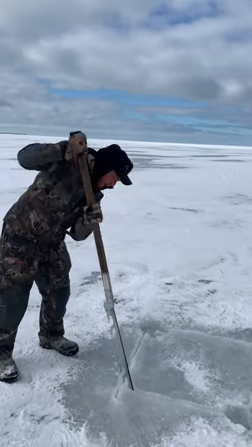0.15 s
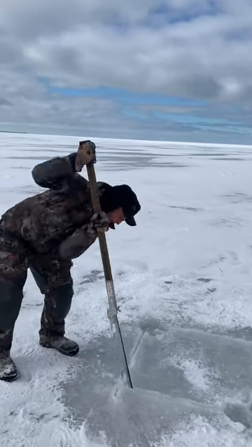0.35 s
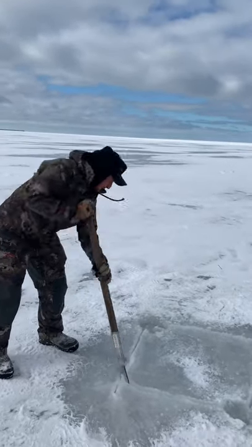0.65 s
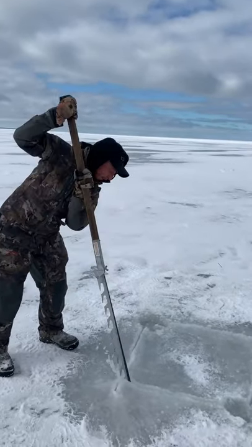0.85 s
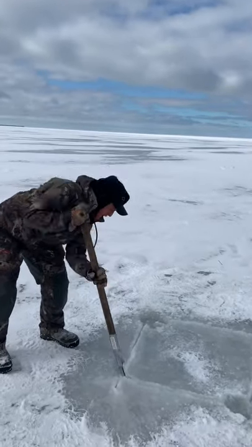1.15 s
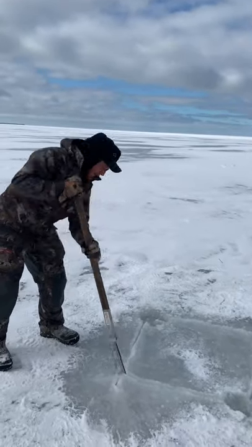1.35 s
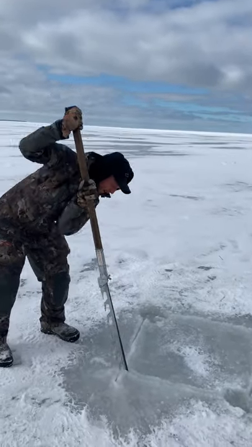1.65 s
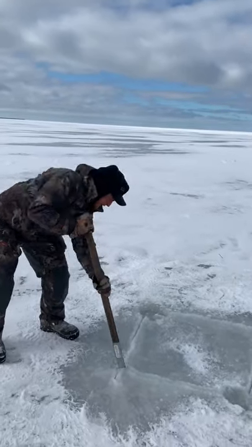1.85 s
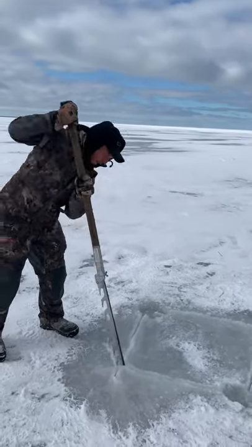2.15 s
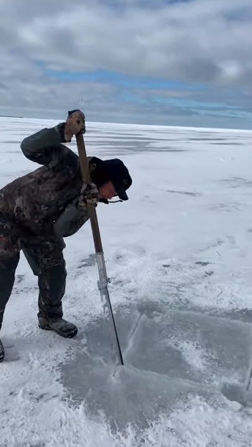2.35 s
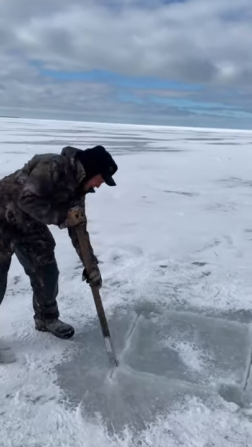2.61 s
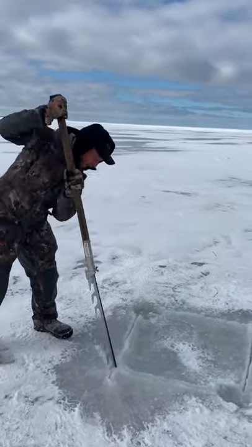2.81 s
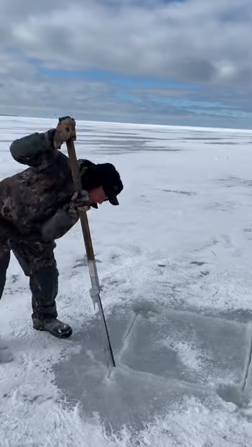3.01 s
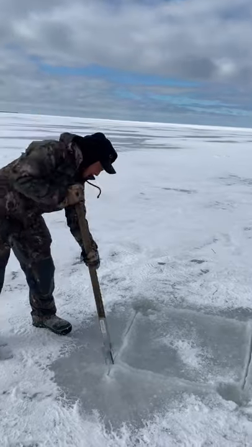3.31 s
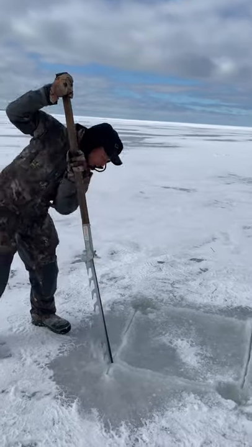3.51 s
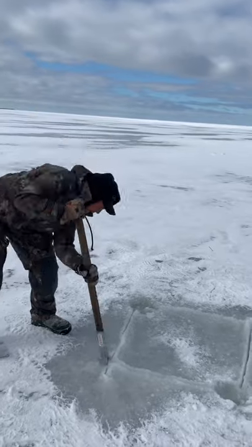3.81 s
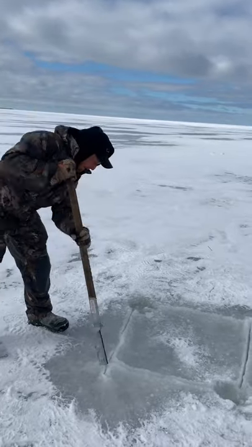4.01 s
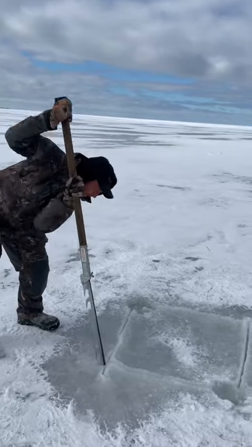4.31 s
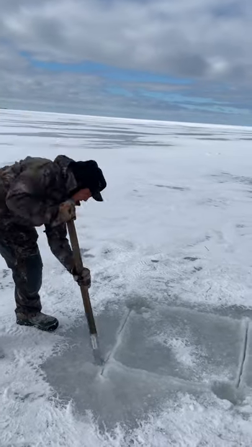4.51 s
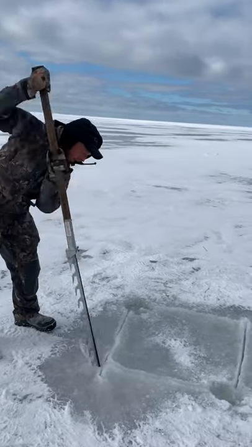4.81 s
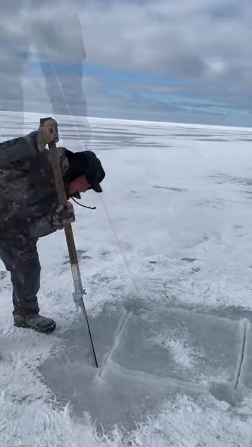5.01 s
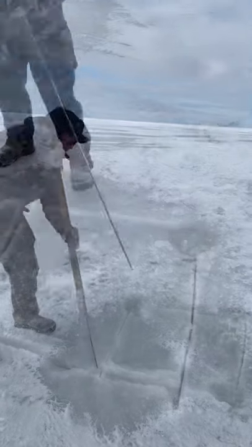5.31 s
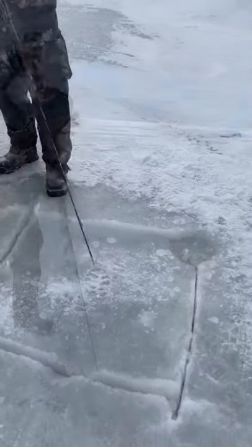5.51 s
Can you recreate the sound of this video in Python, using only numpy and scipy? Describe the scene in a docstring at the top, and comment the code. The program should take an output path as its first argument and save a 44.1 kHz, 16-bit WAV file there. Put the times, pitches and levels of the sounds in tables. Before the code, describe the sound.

Close outdoor sound of a long hand saw cutting lake ice. Quiet, wet, scraping pulls with small knocks alternate with short, bright, crunching pushes, about three every two seconds. Water gurgles once early on. Light wind grows midway into heavy gusts buffeting the microphone, then drops abruptly near the end, leaving a faint pull and a dull last sound.

```python
"""A long hand saw works up and down through thick lake ice in the open, starting on a pull.
Pulled up, the blade drags through slush (clumped noise and ringing grains) and knocks on the slot, ringing faintly;
pushed down, the teeth crush ice into a spray of ringing chips. Water gurgles hollowly in the slot once, early on.
Light wind swells midway into gusts that thump on the microphone, then drops abruptly near 5.2 s; a faint pull
and a short, dull, different sound come last. A faint distant hiss lies under it all."""
import sys
import numpy as np
from scipy import signal
from scipy.fft import rfft, irfft, next_fast_len
from scipy.io import wavfile
from scipy.ndimage import uniform_filter1d

SR = 44100
rng = np.random.default_rng(int(sys.argv[2]) if len(sys.argv) > 2 else 0)


def master_out(mix):
    """Clip the mix to full scale and print it as 16-bit PCM to the path in sys.argv[1]."""
    frames = np.transpose(np.atleast_2d(mix))
    ceiling = np.clip(frames, -1, 1)
    pcm = np.round(ceiling * 32767).astype(np.int16)
    wavfile.write(sys.argv[1], SR, pcm)


N = 249606

# down strokes, and in the last row a short, faint, dull sound of another kind shaped the same way:
#   (bite or onset [s], push builds [s], push holds [s], stop takes [s],
#   level at the bite [dB], level at full push [dB], treble against its median [dB])
DOWN_STROKES_AND_DULL_END = [(0.353, 0.083, 0.11, 0.068, -33, -19, -3.5),
                             (0.989, 0.11, 0.12, 0.054, -29, -19.5, -3.5),
                             (1.669, 0.13, 0.086, .045, -35.5, -18.5, -3),
                             (2.318, 0.1, 0.11, 0.054, -35.5, -19.5, -3),
                             (2.983, 0.1, 0.092, .06, -30, -17.5, -4),
                             (3.641, 0.11, 0.094, 0.06, -33.5, -18.5, -2.5),
                             (4.276, 0.1123, 0.12, 0.027, -32.5, -18.5, -4.5),
                             (4.953, 0.12, 0.078, 0.067, -27, -22, -4),
                             (5.568, 0.017, .06, 0.056, -44, -40, -17)]
SETTLE_S = 0.028   # the blade settles before the bite


def amp(db):
    """Decibels to gain."""
    return 10 ** (np.asarray(db) / 20)


def rms_one(x):
    """Scale to unit rms."""
    return x / np.sqrt(np.mean(x ** 2) + 1e-20)


def in_time(tables):
    """Columns of tables laid end to end, interpolated to every sample."""
    time_s, *columns = np.concatenate(tables).T
    return [np.interp(np.arange(N) / SR, time_s, column) for column in columns]


def moving(strokes, fade_s):
    """1 during the strokes, 0 between them, with ramps of fade_s."""
    t = np.arange(N) / SR
    on = sum((t >= rows[0][0]) & (t <= rows[-1][0]) for rows in strokes) * 1.
    return uniform_filter1d(on, max(int(fade_s * SR), 1), mode="nearest")


def drift(rate_hz):
    """Slow noise of unit rms: white noise through two poles at rate_hz, run at SR / 20."""
    r = np.exp(-40 * np.pi * rate_hz / SR)
    white = rng.standard_normal(N // 20 + 4002)
    slow = signal.lfilter([1], [1, -2 * r, r * r], white)[4000:]   # start-up discarded
    return np.interp(np.arange(N) / 20, np.arange(len(slow)), rms_one(slow))


def ring(clicks, hz, t60_s):
    """Two-pole resonator: a unit click sets off a decaying sine of height 1."""
    r, w = amp(-60 / (t60_s * SR)), 2 * np.pi * hz / SR
    return signal.lfilter([0, np.sin(w)], [1, -2 * r * np.cos(w), r * r], clicks + 1e-18)


def coloured(x, spectrum, tilt_db, pivot_hz, patchy_db, patch_rate_hz):
    """Half-octave bands, each flickering on its own; bands over the pivot follow tilt_db about its median."""
    hz, db = np.transpose(spectrum)
    size = next_fast_len(N)
    f = np.maximum(np.fft.rfftfreq(size, 1 / SR), 1)
    shaped = rfft(x, size) * amp(np.interp(np.log(f), np.log(hz), db, left=-90))
    out = np.zeros(N)
    for octave in np.arange(np.log2(hz[0]), np.log2(hz[-1]) + .5, .5):
        triangle = np.clip(1 - 2 * abs(np.log2(f) - octave), 0, 1)
        band = irfft(shaped * triangle, size)[:N]
        tilt_share = np.clip(octave - np.log2(pivot_hz) + .5, 0, 1)
        flicker_db = patchy_db * drift(patch_rate_hz)
        out += band * amp(flicker_db + tilt_share * (tilt_db - np.median(tilt_db)))
    return rms_one(out)


def at_random(per_s, level_db, hz):
    """Rows (time [s], level [dB], pitch [Hz]) at chance moments, 0-9 dB under level_db."""
    when, size, pitch = rng.random((int(per_s * N / SR), 3)).T
    db = level_db[(when * (N - 1)).astype(int)] - 9 * size
    return list(zip(when * (N - 1) / SR, db, hz * 2 ** (1.2 * (pitch - .4))))


def down_strokes_and_dull_end():
    """Each tooth bites as it enters the ice: crushing throbs faster the harder the push; a dull sound ends it."""
    # power density of the spray: (frequency [Hz], level [dB per Hz])
    crush = [(290, -36), (500, -15), (1510, 0.5), (1800, -2), (3330, -3.5), (4190, -5.5), (6640, -4.5),
             (7340, -9.5), (8850, -5.5), (13600, -15.5), (15500, -14)]
    strokes = down_shape()
    level_db, treble_db, clear = in_time(strokes)
    teeth_per_s = 45 * amp(.4 * (level_db + 19.0) + 1.64 * drift(11.1))
    throb = np.sin(2 * np.pi * np.cumsum(teeth_per_s) / SR)
    bite = amp(1.6 * throb + 0.98 * drift(58))
    broken = (chips(4000, 1.5, ring_s=0.032) + 1.22 * rng.standard_normal(N)) * bite
    spray = coloured(broken, crush, treble_db, 5400, patchy_db=1.5, patch_rate_hz=37)
    steel = amp(-13.0) * rms_one(blade(broken, 10.6))
    return amp(level_db) * moving(strokes, 0.0052) * (spray + steel + whine(clear, -12))


def down_shape():
    """Settle, bite, build, hold, stop: rows (time [s], level [dB], treble [dB], share of blade in air)."""
    settle_db = -25.5             # against the bite
    sag_db, stop_db = -3, -23.5   # end of hold and of stroke, against full push
    bite_treble_db = 3            # a light first touch is brighter
    strokes = []
    for bite_s, build_s, hold_s, stop_s, bite_db, push_db, treble_db in DOWN_STROKES_AND_DULL_END:
        full_s = bite_s + build_s
        strokes.append([(bite_s - SETTLE_S, bite_db + settle_db, treble_db + bite_treble_db, 1),
                        (bite_s, bite_db, treble_db + bite_treble_db, 1),
                        (full_s, push_db, treble_db, .5),
                        (full_s + hold_s, push_db + sag_db, treble_db, 0),
                        (full_s + hold_s + stop_s, push_db + stop_db, treble_db, 0)])
    return strokes


def up_strokes():
    """Slush scrapes along the blade in clumps and keeps it ringing."""
    # power density of the scrape: (frequency [Hz], level [dB per Hz])
    drag = [(320, -4), (550, -8), (1060, -0.5), (1550, -2.5), (1710, -0.5), (2220, -6.5), (2940, -6),
            (7390, -12.5), (8740, -9.5), (15500, -23)]
    strokes = up_shape()
    level_db, treble_db, clear = in_time(strokes)
    clumps = amp(2.8 * drift(18.7))
    slush = (chips(1800, 2.37, ring_s=0.039) + 1.1 * rng.standard_normal(N)) * clumps
    scrape = coloured(slush, drag, treble_db, 3900, patchy_db=1.5, patch_rate_hz=9.4)
    steel = amp(-7.0) * rms_one(blade(slush, 11.7))
    return amp(level_db) * moving(strokes, 0.0068) * (scrape + steel + whine(clear, -7))


def up_shape():
    """Start, build, hold, slow to the top: rows (time [s], level [dB], treble [dB], share of blade in air)."""
    # up strokes, each fading until SETTLE_S before the next down row: (start [s], pull builds [s],
    #   pull holds [s], drag level [dB], level at the top [dB], treble against its median [dB])
    pulls = [(0.0, 0.043, 0.17, -32.5, -47.5, -0.5), (0.607, 0.052, 0.13, -32.5, -50, -0.5),
             (1.263, 0.033, 0.2, -30.5, -56.5, -3.5), (1.936, 0.067, 0.16, -32, -55, -3.5),
             (2.585, 0.084, 0.14, -30.5, -54, -2), (3.237, .11, 0.11, -32, -50, -1),
             (3.899, .13, 0.087, -30, -42.5, -3.5), (4.54, 0.14, 0.097, -30.5, -57.5, -1.5),
             (5.233, 0.043, 0.14, -42.5, -67.5, -3.5)]
    start_db = -12   # against the drag
    strokes = []
    for (start_s, build_s, hold_s, drag_db, top_db, treble_db), down in zip(pulls, DOWN_STROKES_AND_DULL_END):
        full_s = start_s + build_s
        strokes.append([(start_s, drag_db + start_db, treble_db, 0),
                        (full_s, drag_db, treble_db, .15),
                        (full_s + hold_s, drag_db, treble_db, .45),
                        (down[0] - SETTLE_S, top_db, treble_db, 1)])
    return strokes


def chips(per_s, spread_db, ring_s):
    """Ice chips snap at random, each ringing briefly at one of 48 pitches; even power per Hz."""
    sizes = amp(spread_db * np.minimum(rng.exponential(1, N), 5)) * rng.choice([-1, 1], N)
    sizes = sizes * (rng.random(N) < per_s / SR)
    pitches_hz, dealt = np.geomspace(600, 15500, 48), rng.integers(0, 48, N)
    t60_s = ring_s * np.sqrt(1000 / pitches_hz)   # high pitches die sooner
    out = np.zeros(N)
    for k, hz in enumerate(pitches_hz):
        out += np.sqrt(hz / t60_s[k]) * ring(sizes * (dealt == k), hz, t60_s[k])
    return rms_one(out)


def blade(force, spread_db):
    """Modes of the steel blade, each driven by the force with a strength that wanders."""
    # modes of the blade in its slot: (frequency [Hz], relative level [dB], t60 [s])
    modes = [(1100, -13.5, 0.13), (1248, 8, 0.02), (1464, 0, 0.04), (2900, 5, 0.01), (3180, -7.5, 0.1),
             (3390, -7, 0.033), (3823, -2, 0.03), (5970, -32, .03), (8140, -14, 0.028),
             (8730, -11.5, 0.024), (8620, -4.5, 0.069), (11950, -27, .04), (13360, -13, .03)]
    out = np.zeros(N)
    for hz, db, t60_s in modes:
        wander_db = spread_db * np.minimum(drift(15.7), 1.3)
        out += ring(force * amp(db + wander_db), hz, t60_s)
    return out


def whine(clear, level_db):
    """Thin whine of the blade: a narrow band of noise that grows with the share of blade in the air."""
    centre_hz, width_hz = 13500, 400
    edges_hz = [centre_hz - width_hz / 2, centre_hz + width_hz / 2]
    sos = signal.butter(2, edges_hz, "band", fs=SR, output="sos")
    band = signal.sosfilt(sos, rng.standard_normal(N))
    return amp(level_db + 2.0 * drift(15)) * clear ** 2.2 * rms_one(band)


def knocks():
    """Blade on ice: a crunch of a few ms, a short ring of the struck ice and the blade's modes."""
    # blade knocking on ice, chunks snapping off: (time [s], level [dB], ice ring [Hz])
    listed = [(0.0293, -8.5, 760), (0.0677, -19, 1560), (0.0957, -18, 1340), (0.1676, -6, 2910),
              (0.191, -18, 1310), (0.2278, -13, 3190), (0.432, -9, 3390), (0.4794, -13, 3340),
              (0.5302, -4.5, 3360), (0.5907, -13, 1160), (0.634, -20, 2300), (0.6585, -12, 1140),
              (0.7213, -12, 1610), (0.7918, -10.5, 1090), (0.8196, -15, 1080), (1.1005, -9, 1990),
              (1.2062, -8.5, 2900), (1.2444, -12, 1340), (1.277, -23, 810), (1.382, -18, 1190),
              (1.4632, -10, 1720), (1.5174, -14, 1100), (1.7629, -7, 3350), (1.8123, -4.5, 1488),
              (1.8587, -11, 2700), (2.0465, -15.5, 1070), (2.3141, -24, 1280), (2.4111, -5, 1620),
              (2.554, -14, 2050), (2.5945, -18, 1280), (2.607, -16, 2090), (2.643, -14.5, 1320),
              (2.6785, -26, 1100), (2.7003, -9, 1210), (2.7692, -12, 2940), (2.9794, -18, 1224),
              (3.046, -8.5, 1350), (3.0779, -5.5, 1130), (3.1631, -6.5, 3397), (3.2518, -17.5, 772),
              (3.2994, -13, 1070), (3.4795, -21.5, 2010), (3.639, -21, 1310), (3.7284, -7.5, 2620),
              (3.7724, 0.5, 1220), (3.8438, -7.5, 1390), (3.9148, -19, 1190), (4.019, -9, 1200),
              (4.1216, -16, 1100), (4.3406, -9.5, 1257), (4.4864, -6.5, 3350), (4.508, -8.5, 3530),
              (4.5254, -14, 880), (4.57, -12.5, 1300), (4.6194, -17.5, 1170), (4.6513, -15, 2470),
              (4.671, -13, 1300), (4.717, -13, 1100), (4.7656, -11, 1260), (4.9521, -15, 2550),
              (5.2679, -19.5, 1030), (5.311, -15.5, 1090), (5.393, -20.5, 1250), (5.4428, -28, 3120),
              (5.5697, -24.5, 1840)]
    ticks_per_s, tick_db, tick_hz = 7.4, 4.5, 1200   # random ticks; dB over the pull, loudest case
    treble_mean_db, treble_spread_db = -18, 5
    strokes = up_shape()
    pull_db = np.where(moving(strokes, 0) > 0, in_time(strokes)[0], -90)
    blows = list(listed) + at_random(ticks_per_s, pull_db + tick_db, tick_hz)
    out, clicks = np.zeros(N + SR), np.zeros(N)
    t = np.arange(SR // 16) / SR
    envelope = 1.2 * np.exp(-t / 0.003) * (1 - np.exp(-t / 0.00081))
    noise = rng.standard_normal((len(blows), 2, len(t)))
    treble = signal.butter(1, [5000, 11000], "band", fs=SR, output="sos")
    middle = signal.butter(2, [950, 4500], "band", fs=SR, output="sos")
    for (time_s, db, hz), (dull, bright) in zip(blows, noise):
        at = round(time_s * SR)
        body = 0.096 * ring(dull * envelope, hz, 0.015)
        treble_db = treble_mean_db + treble_spread_db * dull[0]   # one random draw per blow
        crunch = 0.81 * signal.sosfilt(middle, bright) + amp(treble_db) * signal.sosfilt(treble, bright)
        out[at:at + len(t)] += amp(db) * (body + crunch * envelope)
        clicks[at] = amp(db - 23)
    return out[:N] + blade(clicks, 3.7)


def gurgle():
    """Water gurgles hollowly in the slot once, early on: wavering noise bands on a gliding pitch."""
    # glide: (time [s], pitch [Hz], level [dB])
    glide = [(1.2, 650, -52), (1.25, 642, -36), (1.3, 616, -40.5), (1.4, 595, -46)]
    # rough strands: (multiple of the pitch, relative level [dB])
    strands = [(1, 2.5), (1.45, 0.5), (1.8, -6), (2.3, -5)]
    hz, level_db = in_time([glide])
    out = np.zeros(N)
    for multiple, db in strands:
        strand_hz = multiple * hz * (1 + 0.033 * drift(9.96))
        phase = 2 * np.pi * np.cumsum(strand_hz) / SR
        carrier = drift(33) * np.sin(phase) + drift(28.6) * np.cos(phase)
        out += amp(db + 2.7 * drift(9)) * carrier
    return amp(level_db) * moving([glide], 0.033) * out


def wind():
    """Eddies tumble over the microphone port: lumpy rumble, the biggest as thumps of a few cycles."""
    # gusts: (time [s], rumble level [dB], upper flutter against its median [dB])
    gusts = [(0.0, -34.5, -5.5), (1.01, -32, -6), (1.26, -32, -3.5), (1.56, -35.5, -11), (2.21, -43, -3),
             (2.63, -35.5, -10.5), (2.69, -29.5, 7.5), (2.79, -28, 2), (2.92, -20, -0.5), (3.26, -16, -2.5),
             (3.53, -19, -9), (3.74, -22, -1), (4.21, -16.5, -7), (4.81, -18.5, -8.5), (4.96, -19.5, -1),
             (5.26, -39, -2), (5.5, -33, -42), (5.66, -38, -10)]
    # power density of the rumble: (frequency [Hz], level [dB per Hz])
    rumble = [(12, -48), (20, -22), (59, 3.5), (163, -2), (333, -12.5), (560, -24), (700, -37.5),
              (910, -48), (1540, -120)]
    # biggest eddies: (centre [s], level [dB], pitch [Hz])
    big_eddies = [(.129, -21.5, 75.5), (.328, -22, 102), (.685, -19, 95), (.83, -26, 101),
                  (1.039, -14, 173), (1.223, -25, 118), (1.402, -22, 91), (1.744, -23.5, 98.8),
                  (2.7, -9, 123), (2.75, -10, 84.5), (2.803, -7, 69.6), (2.849, -10, 100), (2.891, -8, 154),
                  (2.954, -9, 176), (2.999, -5, 155), (3.04, -5, 153.8), (3.129, -7, 122), (3.2, -11.5, 62),
                  (3.262, -10.5, 179.3), (3.29, -6.5, 148.5), (3.319, -10, 109), (3.37, -12, 71.6),
                  (3.421, -11, 108), (3.62, -7.5, 99), (3.773, -9, 118), (3.882, -6.5, 174),
                  (3.949, -12, 75), (4.031, -10.5, 107), (4.158, -13, 72), (4.229, -12, 159),
                  (4.428, -4, 119), (4.539, -12.5, 104), (4.568, -13.5, 293), (4.612, -11, 182),
                  (4.667, -11.5, 135), (4.836, -7, 93.4), (4.88, -9.5, 104), (4.93, -13, 73),
                  (4.97, -12.5, 134), (5.02, -8, 103.8), (5.11, -15, 135), (5.235, -15, 97.4),
                  (5.424, -27, 99), (5.48, -29, 121.5), (5.52, -28, 96)]
    flicks_per_s, flick_db, flick_hz = 12, 6, 132   # smaller random eddies; dB over the rumble, loudest case
    crest_s, crest_db = 0.00076, -7.5               # the sharp tip of a thump
    level_db, flutter_db = in_time([gusts])
    lumps = rng.standard_normal(N) * amp(3.8 * drift(28.6))
    out = amp(level_db) * coloured(lumps, rumble, flutter_db, 146, patchy_db=2.0, patch_rate_hz=6.7)
    t = np.arange(-SR // 20, SR // 20) / SR
    thumps = list(big_eddies) + at_random(flicks_per_s, level_db + flick_db, flick_hz)
    turns = rng.uniform(0, 2 * np.pi, len(thumps))
    for (centre_s, db, hz), turn in zip(thumps, turns):
        at = np.clip(round(centre_s * SR) + np.arange(len(t)) - SR // 20, 0, N - 1)
        overtone = 0.29 * np.cos(2 * np.pi * 2.247 * hz * t)   # sharpens the crest
        wave = np.cos(2 * np.pi * hz * t + turn) + overtone
        tip = amp(crest_db) * np.cos(turn) * np.exp(-(t / crest_s) ** 2)
        swell = np.exp(-(t / (0.0022 + 0.49 / hz)) ** 2)
        out[at] += amp(db) * (wave * swell + tip)
    return out


def distant_hiss():
    """Steady noise whose half-octave bands flicker."""
    # power density: (frequency [Hz], level [dB per Hz])
    spectrum = [(180, -37), (300, 4.5), (1140, -2), (7750, -16), (8990, -11), (9760, -17.5), (15500, -18.5)]
    white = rng.standard_normal(N)
    return amp(-46) * coloured(white, spectrum, 0, 5000, patchy_db=5.0, patch_rate_hz=7.4)


def ice_echo(near):
    """Dull echo off the flat ice: 4.5 ms late, through a one-pole low-pass."""
    late = np.concatenate([np.zeros(int(.0045 * SR)), near])[:N]
    return amp(-21) * signal.lfilter([.3], [1, -.6], late)


def scene():
    """Saw and gurgle, their echo, wind and distant hiss."""
    strokes = down_strokes_and_dull_end() + up_strokes() + knocks()
    # the narrow blade radiates little bass
    saw = signal.sosfilt(signal.butter(3, 650, "high", fs=SR, output="sos"), strokes)
    near = saw + gurgle()
    return (near + ice_echo(near) + wind() + distant_hiss())[None]


def record(dry):
    """The deepest bass rolls off, peaks are rounded, the top is cut."""
    high_pass = signal.butter(2, 38, "high", fs=SR, output="sos")
    low_pass = signal.ellip(14, .5, 85, 15720, fs=SR, output="sos")
    rounded = 1.2 * np.tanh(signal.sosfilt(high_pass, dry) / 1.2)
    return signal.sosfilt(low_pass, rounded)


dry = scene()
out = record(dry)
master_out(out)
```